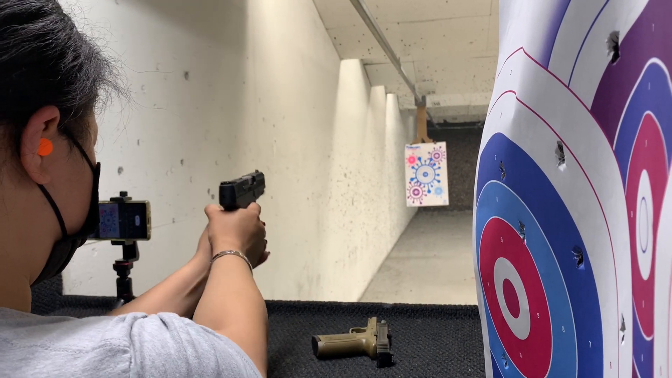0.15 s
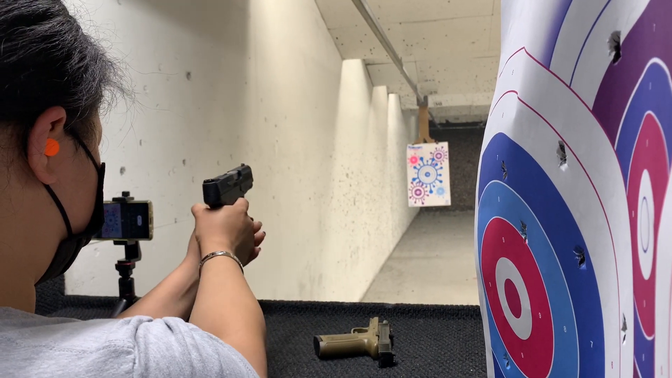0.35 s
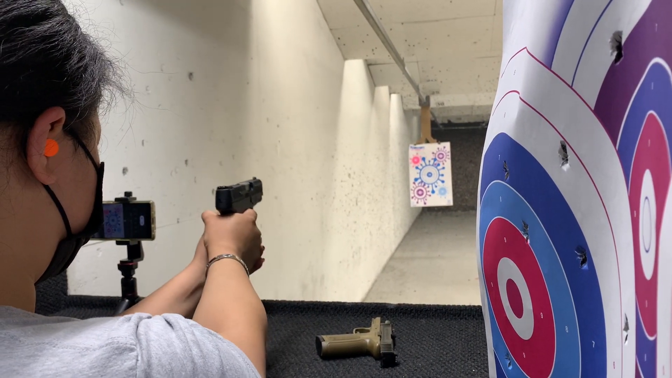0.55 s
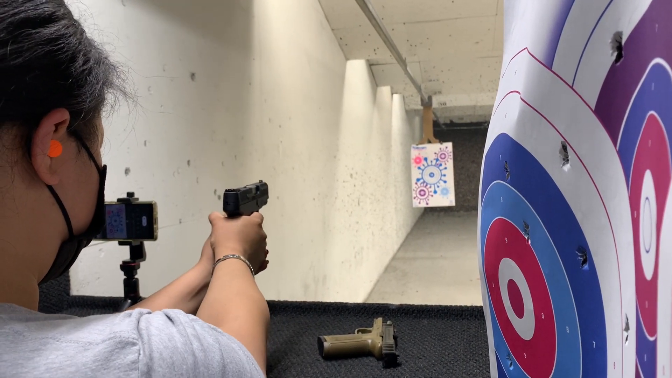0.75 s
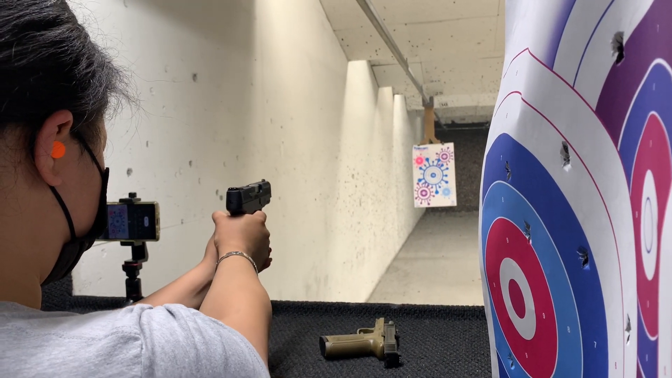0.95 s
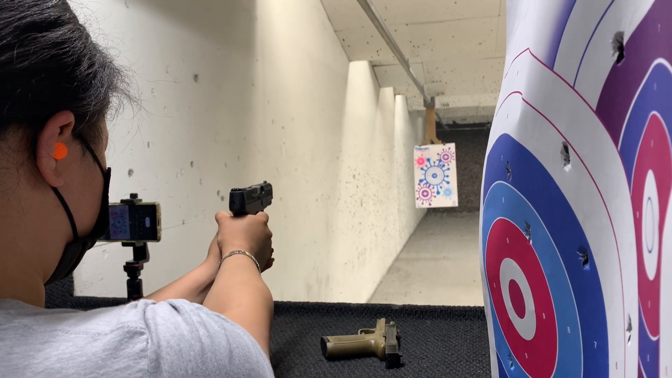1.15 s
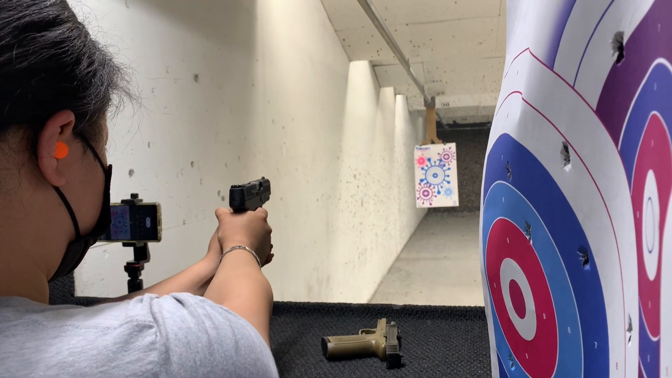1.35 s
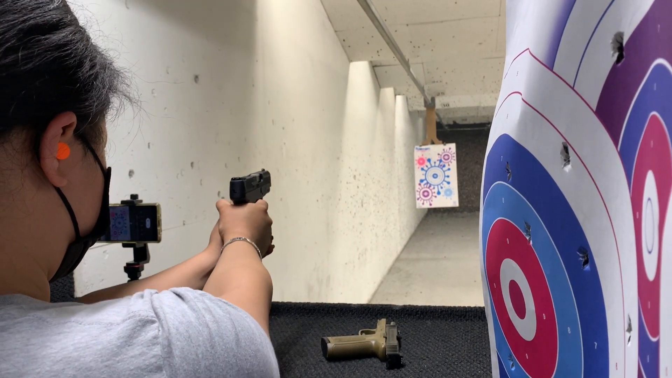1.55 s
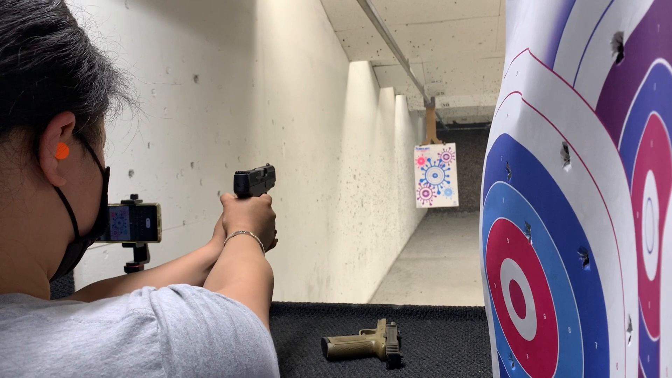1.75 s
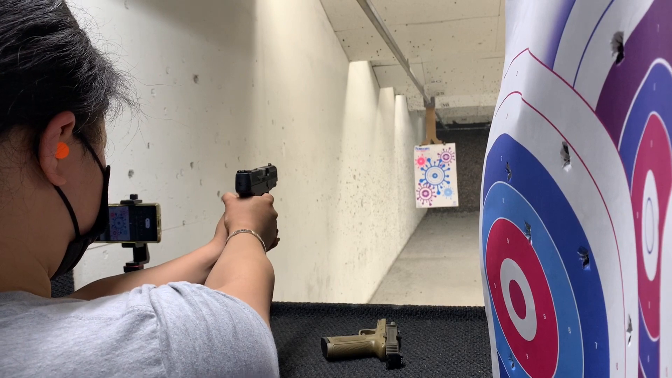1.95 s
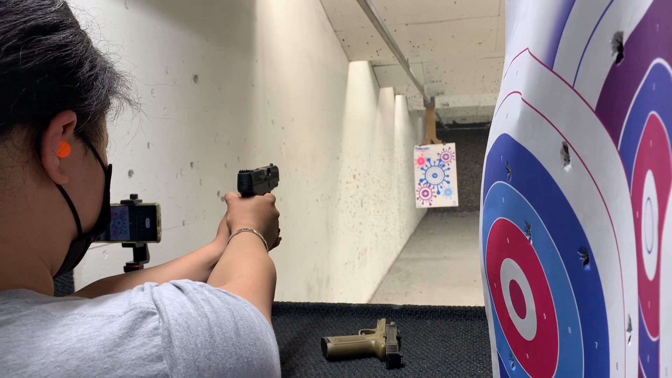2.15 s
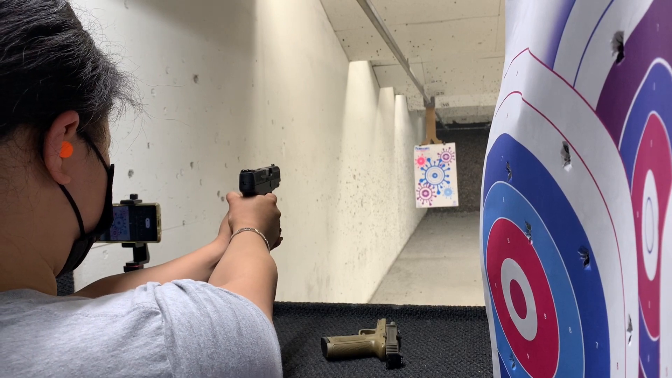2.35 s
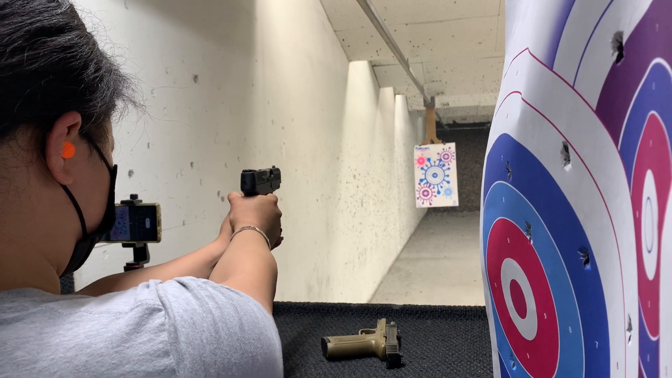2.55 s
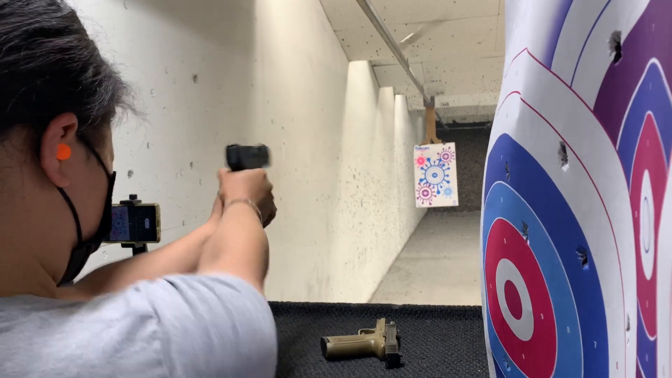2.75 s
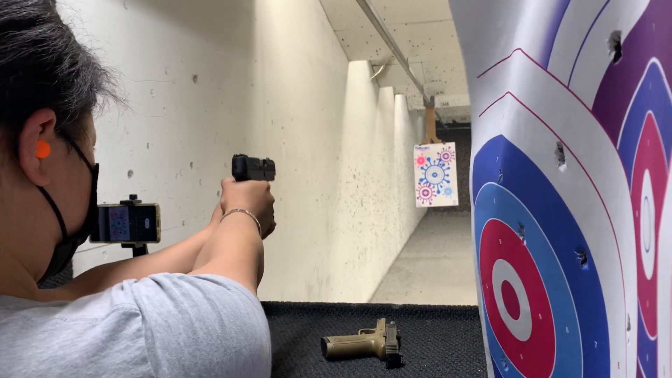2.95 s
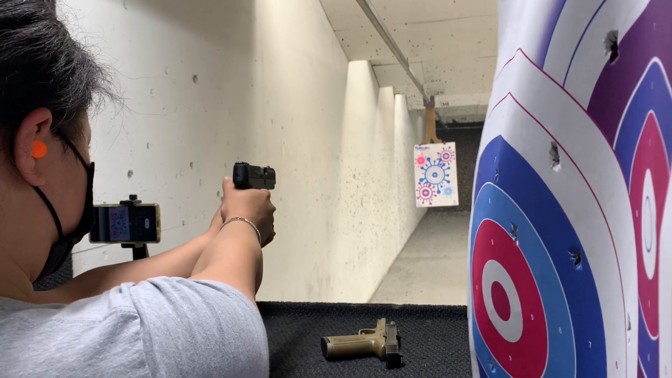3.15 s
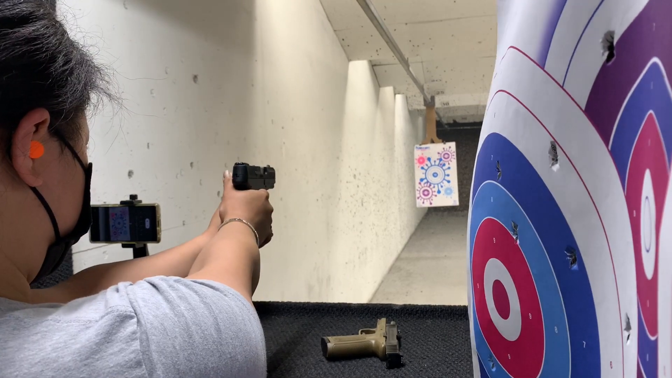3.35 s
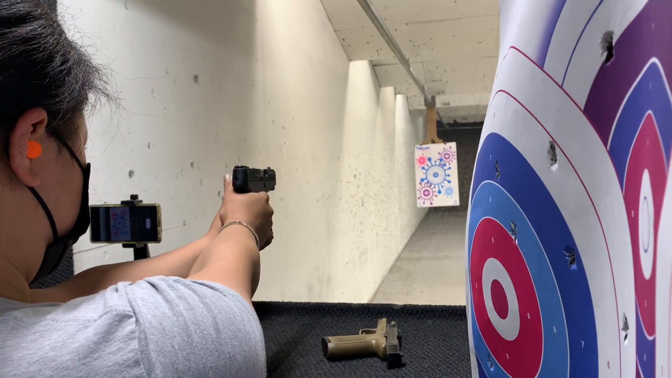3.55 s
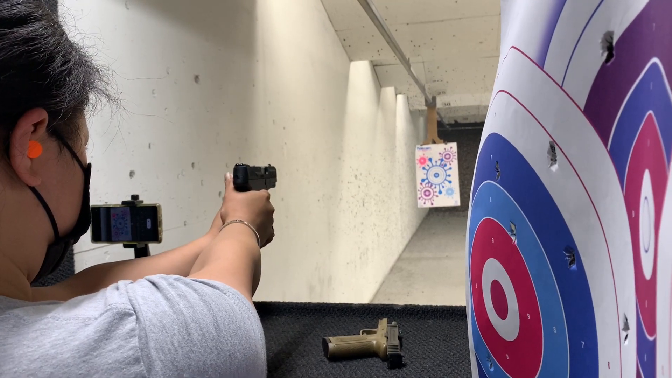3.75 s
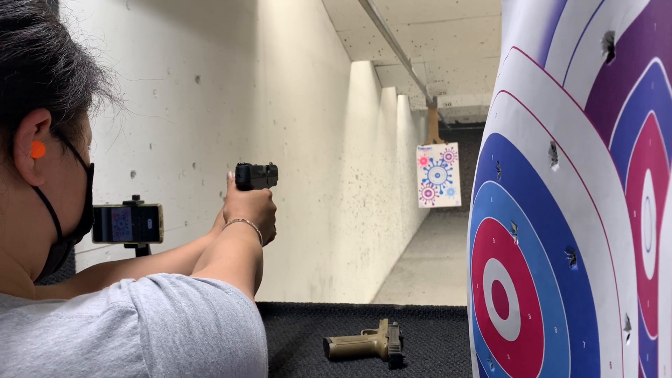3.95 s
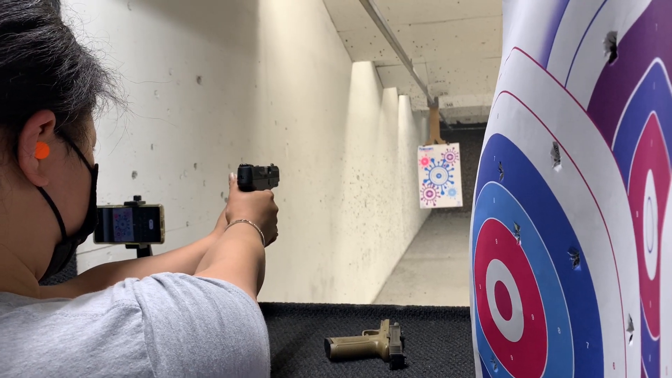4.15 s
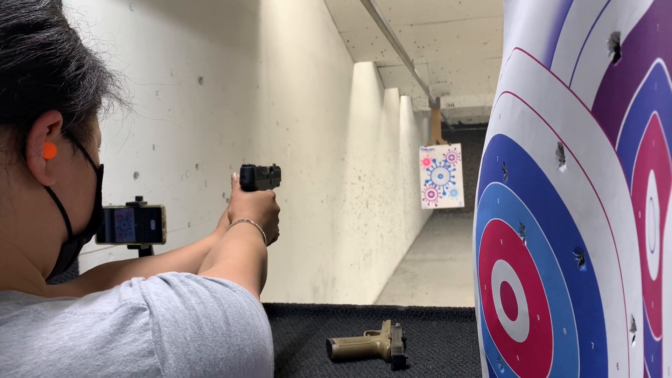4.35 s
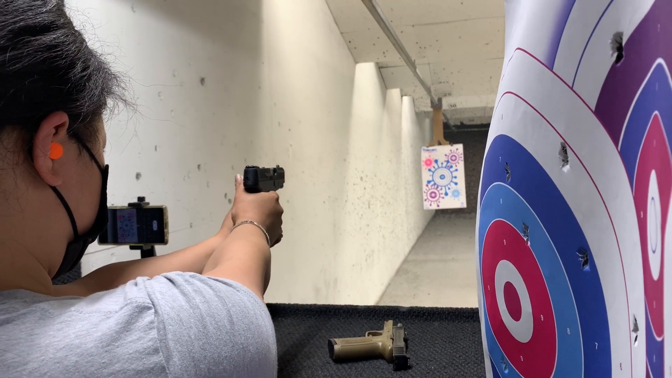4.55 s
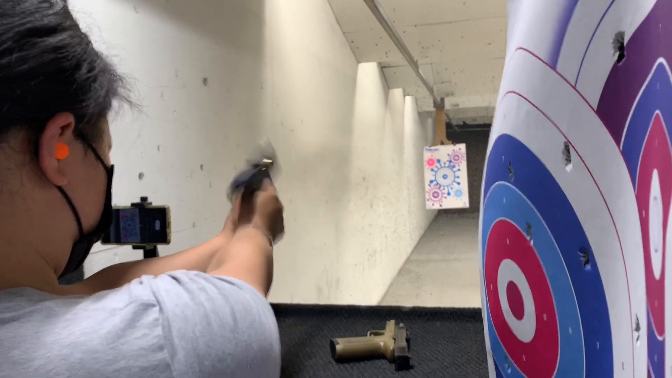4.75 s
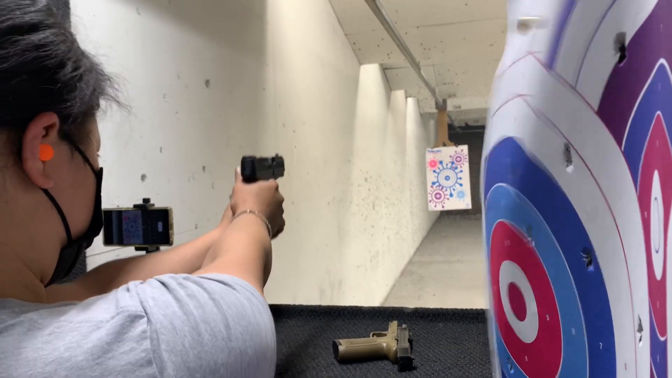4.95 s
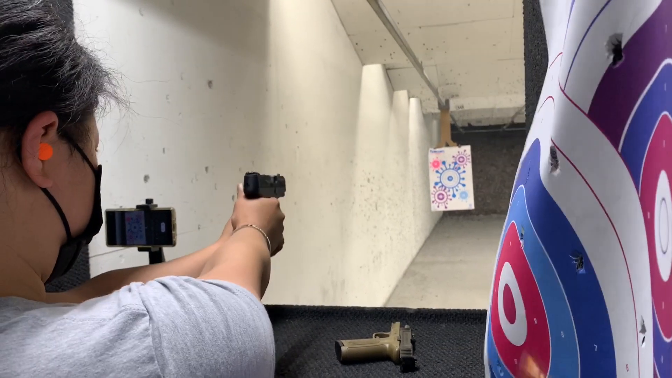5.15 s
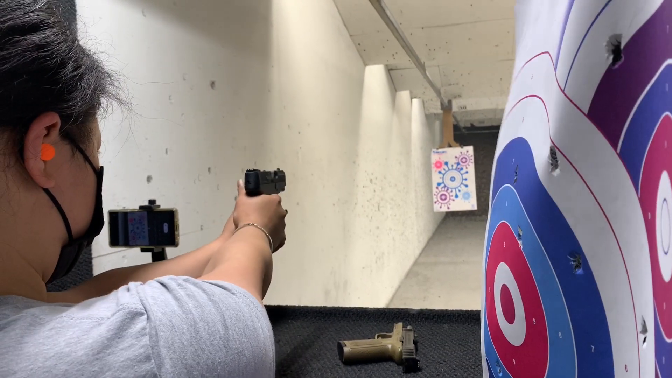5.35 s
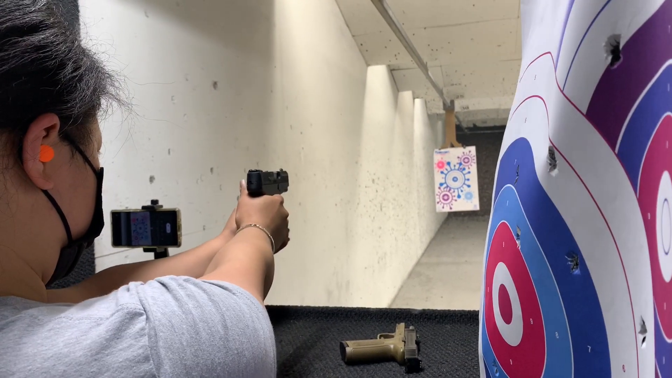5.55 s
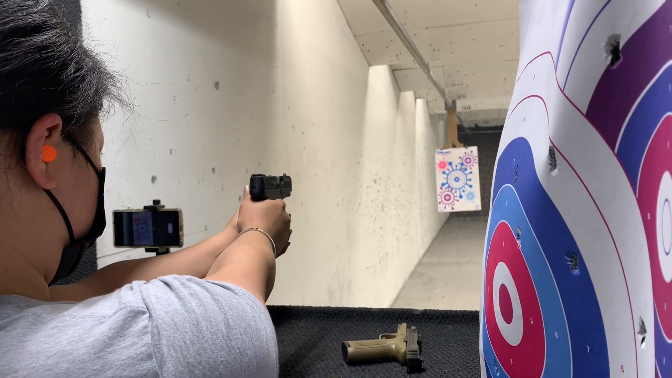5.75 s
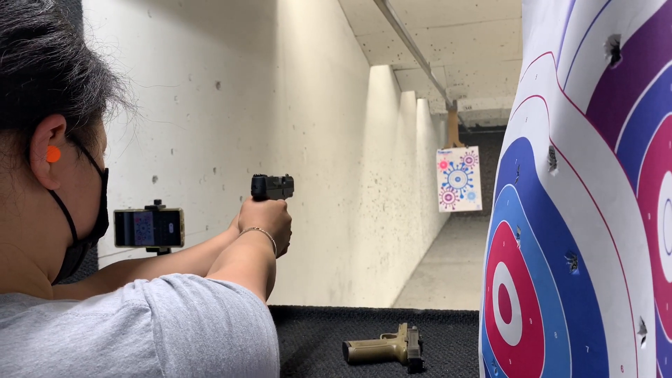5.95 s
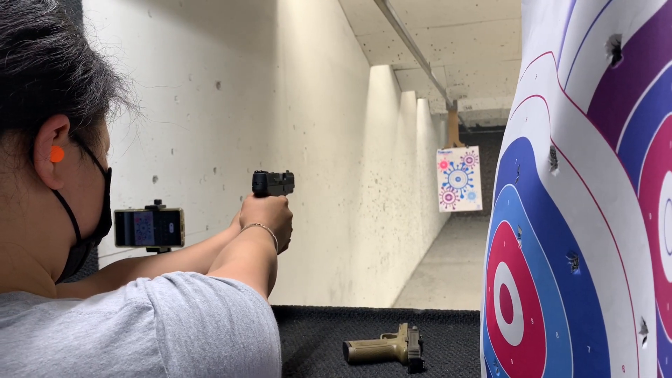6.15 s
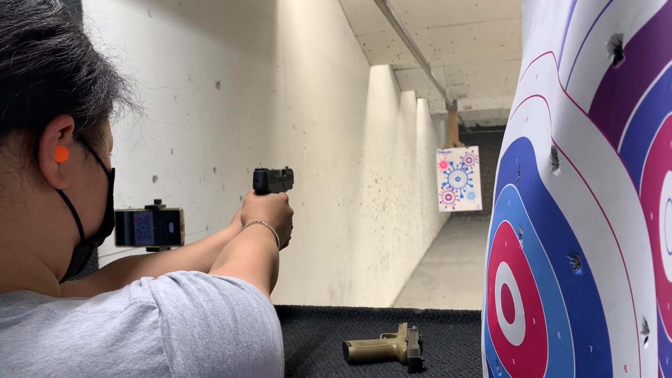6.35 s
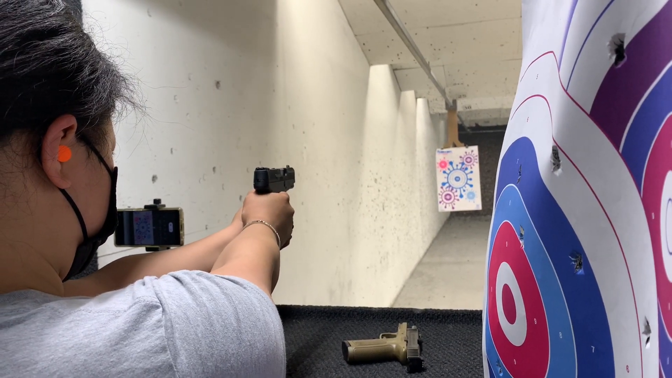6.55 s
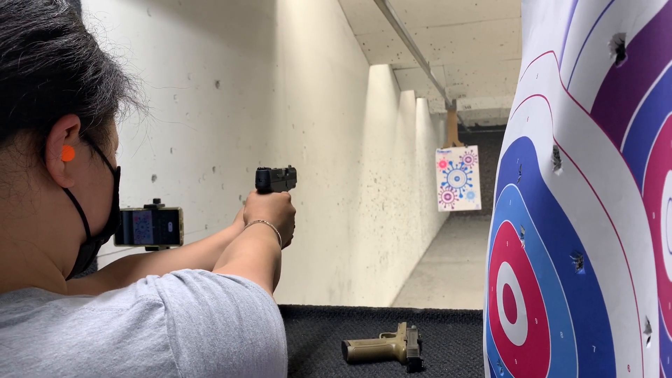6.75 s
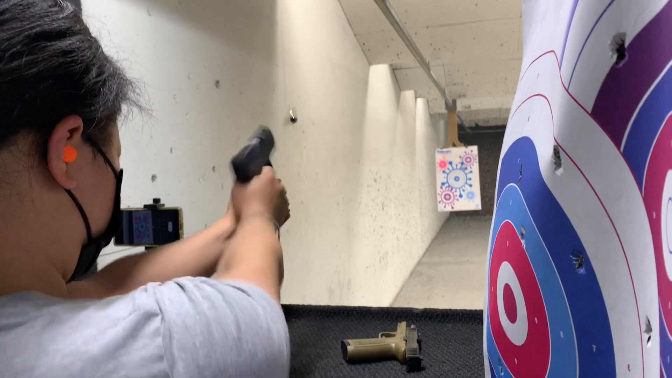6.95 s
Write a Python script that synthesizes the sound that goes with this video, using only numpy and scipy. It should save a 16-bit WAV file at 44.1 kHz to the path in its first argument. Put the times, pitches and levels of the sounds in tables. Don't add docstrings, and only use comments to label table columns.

```python
import sys
import numpy as np
from scipy import signal
from scipy.fft import rfft, irfft, next_fast_len
from scipy.io import wavfile
from scipy.ndimage import uniform_filter1d, map_coordinates

SR = 44100
rng = np.random.default_rng(int(sys.argv[2]) if len(sys.argv) > 2 else 0)


def put_to_file(sound):
    columns = np.atleast_2d(sound).T
    safe = np.clip(columns, -1, 1)
    whole_steps = np.round(safe * 32767)
    wavfile.write(sys.argv[1], SR, whole_steps.astype(np.int16))


def invert_db(level):
    return 10 ** (np.asarray(level, dtype=float) / 20)


N = 313110

# (time [s], peak level [dB], hall level [dB], lane)
SHOTS = [
    (0.65, -5, 1.5, "next"),
    (1.008, -3.5, -2.7, "next"),
    (1.356, -4, -2, "next"),
    (2.548, -15, 1.5, "far"),
    (2.652, -5.5, 2, "own"),
    (4.747, -4, 1.5, "own"),
    (5.064, -10.5, 6.5, "wall"),
    (6.896, -4, -.7, "own"),
]


def unit(x):
    return x / np.sqrt(np.mean(x ** 2) + 1e-20)


def along(points, hz):
    f, v = np.transpose(points)
    return np.interp(np.log(hz + 1), np.log(f + 1), v)


def filtered(x, response):
    n = x.shape[-1]
    m = next_fast_len(n + 8192)
    return irfft(rfft(x, m) * response(np.fft.rfftfreq(m, 1 / SR)), m)[..., :n]


def resonant(peaks):
    def response(f):
        total = 0
        for k, (centre, width, db) in enumerate(peaks):
            damping = 1j * f * width
            total = total + (-1) ** k * invert_db(db) * damping / (centre * centre - f * f + damping)
        return total
    return response


def spread(pair):
    # (frequency [Hz], phase [rad])
    left_lead = [(60, .05), (200, 0.61), (350, 0.63), (570, 1.7), (900, 6.67), (1400, 3)]
    treble_lag = 1 / 3350

    def lead(hz):
        return np.where(hz < 4000, along(left_lead, hz), -2 * np.pi * hz * treble_lag)
    return filtered(pair, lambda hz: np.exp(.5j * np.outer([1, -1], lead(hz))))


def ports(n):
    # (frequency [Hz], likeness [0-1])
    likeness = [(60, 0.8), (200, 0.9), (350, 0), (900, 0), (1500, 0.1), (3000, .1), (7000, 0), (9000, 0),
                (10500, .93), (15000, 0.79)]

    def shares(hz):
        turn = np.arccos(np.clip(along(likeness, hz), 0, 1)) / 2
        return np.array([np.cos(turn), np.sin(turn)])
    mid, side = filtered(rng.standard_normal((2, n)), shares)
    return spread(np.array([mid + side, mid - side]))


def narrow(peaks, n, sharp=1):
    def response(f):
        return sum(invert_db(db) * resonant([(hz, sharp * w, 0)])(f) ** 2 for hz, w, db in peaks)
    return unit(filtered(ports(n), response))


def dying(noise, t60s, patchy_db=0):
    hz, t, z = signal.stft(noise, SR, nperseg=256)
    clumps = uniform_filter1d(rng.standard_normal(z.shape[1:]), size=5, axis=0)
    clumps = unit(uniform_filter1d(clumps, size=4, axis=1))
    fade_db = -60 * t / np.clip(along(t60s, hz), .02, 9)[:, None]
    faded = signal.istft(z * invert_db(fade_db + patchy_db * clumps), SR, nperseg=256)[1]
    return faded[:, :noise.shape[1]]


def ringing(modes, t, attack, spread_db, unlike):
    hz, db, t60 = np.transpose(modes)[:, :, None, None]
    luck = rng.standard_normal((2, len(modes), 2, 1))
    phase = 2 * luck[1, :, :1] + unlike * luck[1]
    strength = invert_db(db + spread_db * luck[0, :, :1] - 60 * t / np.clip(t60, .02, 4))
    sines = strength * np.sin(2 * np.pi * hz * t + phase)
    return sines.sum(0) * (1 - np.exp(-t / attack))


def add(out, s, db, pan_db, x):
    part = out[:, round(s * SR):][:, :x.shape[1]]
    part += (invert_db(db + pan_db * np.array([[.5], [-.5]])) * x)[:, :part.shape[1]]


def ventilation():
    # (frequency [Hz], level [dB per Hz])
    rush_colour = [(13, -52), (22, -26.5), (60, 2.5), (87, -20), (156, -16), (256, -28), (400, -36),
                   (700, -40.5), (1300, -44), (2600, -53), (5000, -61), (11000, -61.5), (16000, -74)]
    # (frequency [Hz], width [Hz], level [dB])
    duct_tones = [(57.6, 12, -69), (148, 18, -76.5)]
    surge_db, surge_s = 9, .55
    level_db = -62.5 + surge_db * np.exp(-np.arange(N) / SR / surge_s)
    rush = unit(filtered(ports(N), lambda hz: invert_db(along(rush_colour, hz))))
    tones = sum(invert_db(db) * narrow([(hz, w, 0)], N) for hz, w, db in duct_tones)
    return invert_db(level_db) * (invert_db(-2.5) * rush + invert_db(63.5) * tones)


def duct():
    # (frequency [Hz], level [dB])
    duct_modes = [(623, 0), (632, -2.5)]
    earlier_shot_ago, fade_db_per_s = 2.5, 6
    t = np.arange(N) / SR
    fired = np.array([-earlier_shot_ago] + [row[0] for row in SHOTS])
    since = t - fired[np.searchsorted(fired, t, "right") - 1]
    drift = map_coordinates(rng.standard_normal(30), [4 * t])
    sides = np.array([[.4], [-.4]])
    pair = 0
    for k, (hz, db) in enumerate(duct_modes):
        pair = pair + invert_db(db) * np.sin(2 * np.pi * hz * t + 2.2 * k * drift + sides)
    return uniform_filter1d(invert_db(-72.5 - fade_db_per_s * since), size=2000, origin=999) * pair


def sheet():
    swing_hz, swing_db, after_s, lasts_s = 58, -47, .3, .15
    t = np.arange(N) / SR
    swing = sum(np.exp(-((t - s - after_s) / lasts_s) ** 4) for s, *_, lane in SHOTS if lane == "own")
    return invert_db(swing_db) * swing * np.sin(2 * np.pi * swing_hz * t + np.array([[-.3], [.3]]))


def casings():
    # (time [s], body tick [dB], mouth ring [dB], tick frequency [Hz])
    bounces = [(1.935, -62, -67, 4940), (1.9843, -68.5, -77.5, 5450), (2.2184, -67.5, -91, 5300),
               (2.2604, -82.5, -83, 5340), (2.3945, -59, -69.5, 5210), (2.4214, -50.5, -69, 5350),
               (3.127, -61.5, -87, 5260), (3.3498, -64, -77, 4180), (3.4022, -57, -56, 4170),
               (3.5349, -63.5, -72, 4600), (3.6994, -79.5, -97.5, 4330), (3.9379, -57.5, -79, 4500),
               (4.1294, -88.5, -93, 4220), (5.5263, -55, -59.5, 5400), (6.0551, -66, -60, 6300),
               (6.315, -63, -74, 4036), (6.4447, -60.5, -71, 4540), (6.5252, -83, -87, 4490),
               (6.6634, -89.5, -77, 5050), (6.7184, -85, -72, 4150)]
    # (frequency [Hz], level [dB], t60 [s])
    tube_modes = [(10760, 0, .36), (10830, -2, .32), (10900, -6, .24), (10620, -10, .12)]
    # (multiple of tick frequency, width as share of it, level [dB])
    overtones = [(1.25, 0.18, -8.5), (1.58, 0.13, -10.5), (2.55, .3, -15.5)]
    # (time [s], length [s], level [dB])
    stirs = [
        (3.34, 0.14, -60),
        (4.168, .17, -66),
        (4.63, .12, -87.5),
    ]
    out, t = np.zeros((2, N)), np.arange(SR // 2) / SR
    for s, tick_db, ring_db, tick_hz in bounces:
        puff = ports(len(t)) * (invert_db(-60 * t / .012) + invert_db(-10.5 - 60 * t / 0.23))
        body = [(tick_hz, 0.15 * tick_hz, 0)]
        body += [(k * tick_hz, w * tick_hz, level_db) for k, w, level_db in overtones]
        tick = filtered(puff, resonant(body))
        click = invert_db(8) * filtered(puff, lambda hz: hz ** 4 / (hz ** 4 + 11000 ** 4))
        ring = spread(ringing(tube_modes, t, .003, spread_db=1.5, unlike=.2))
        add(out, s, tick_db + 10, 2.5, tick)
        add(out, s, ring_db - 1.5, 0, ring + click)
    for s, length, db in stirs:
        stir = filtered(ports(len(t)), lambda hz: hz / (hz + 900) / (1 + (hz / 5500) ** 1.8) * (hz < 14600))
        add(out, s, db, 0, stir * np.exp(-(t / length) ** 4) * (1 - np.exp(-t / 0.0079)))
    return out


def lead_in(s, noise):
    block_s, block_start = 1024 / SR, .623
    early = (s - .010 - block_start) % block_s + .010
    u = np.linspace(0, 1, round(early * SR))
    smear = filtered(noise[:, -len(u):], lambda hz: (hz < 8400) * (1 + hz / 6000))
    return s - early, smear * (0.32 * u + u ** 5)


def pressure_pulse(t):
    # (frequency [Hz], width [Hz], level [dB])
    bench = [(620, 300, -3), (1120, 350, -1)]
    n = SR // 10
    luck = rng.random((9, 3))
    delay = np.cumsum(.0012 + .004 * luck[:, :1], axis=0) - .001
    arrival = delay + 0.00017 * (luck[:, 1:] - .5)
    u = np.clip((t[:n] - arrival[:, :, None]) / 0.0001, 0, 60)
    strength = np.sign(luck[:, :1] - .35) * invert_db(-60 * delay / .2)
    pulses = (u > 0) * (1 - u) * np.exp(-u) * strength[:, :, None]

    def response(hz):
        return .4 / (1 + (hz / 2500) ** 2) + np.abs(resonant(bench)(hz))
    return np.pad(filtered(pulses.sum(0), response), ((0, 0), (0, len(t) - n)))


def muzzle_crack(t, crack_db, rise_s):
    late = t - 1.4 * rise_s
    snaps = invert_db(-60 * t / 0.025) * (1 - np.exp(-t / (.12 * rise_s)))
    snaps = snaps + invert_db(-4.0 - 60 * late / .05) * (late > 0)
    crack = invert_db(crack_db - 12.5) * snaps * filtered(ports(len(t)), lambda hz: hz / (hz + 1500))
    return crack + invert_db(1.2 * crack_db + 5) * pressure_pulse(t)


def pressure_thump(t, thump_db):
    push = np.sin(2 * np.pi * 55 * t + np.array([[-.3], [.3]]))
    return invert_db(thump_db - 11.5) * push * invert_db(-60 * t / .2) * (1 - np.exp(-t / 0.0065))


def blast_noise(n, bright_db, boom_db):
    # (frequency [Hz], level [dB per Hz])
    blast_colour = [(15, -46.5), (25, -26), (70, -15), (130, -10.5), (238, -2.5), (410, -2.5), (651, -2),
                    (877, -9), (1180, -9), (1830, -14.5), (8360, -30), (14300, -33.5), (15600, -45.5),
                    (16600, -89)]

    def colour(hz):
        bright = bright_db * np.log2(np.clip(hz, 700, SR) / 700)
        boom = boom_db * np.log2(np.clip(hz, 100, 700) / 700)
        return invert_db(along(blast_colour, hz) + bright - boom)
    return unit(filtered(ports(n), colour))


def booth_and_hall(t, near_noise, hall_noise, hall_db):
    # (frequency [Hz], t60 [s])
    booth_t60 = [(60, 0.95), (200, .4), (700, 0.38), (3000, 0.21), (8000, 0.28), (14000, 0.11)]
    # (frequency [Hz], t60 [s])
    hall_t60 = [(60, 0.27), (200, 1), (700, 0.65), (3000, 0.59), (8000, 0.48), (14000, .35)]
    room = invert_db(1.6) * dying(near_noise, booth_t60, patchy_db=2.2)
    room = room + invert_db(hall_db - 9) * dying(hall_noise, hall_t60, patchy_db=1.5)
    bass = filtered(room, lambda hz: 1 / (1 + (hz / 380) ** 4))
    middle = filtered(room, lambda hz: np.exp(-np.log2((hz + 1) / 440) ** 4))

    def bump(at):
        return np.exp(-((t - at) / .045) ** 2)
    swell = invert_db(4.5 * bump(.3) - 3.5 * bump(.195)) - 1
    return room - bass * np.exp(-t / .011) + swell * middle


def far_building(n):
    # (frequency [Hz], level [dB per Hz])
    tail_colour = [(59, -51.5), (100, -17), (157, -3), (353, -15), (477, -26), (905, -28), (1030, -24.5),
                   (9000, -50), (11700, -73.5), (19800, -120)]
    # (frequency [Hz], t60 [s])
    tail_t60 = [(60, 0.69), (200, 0.93), (700, 1.8), (3000, 2.2), (8000, 1), (14000, .6)]
    noise = unit(filtered(ports(n), lambda hz: invert_db(along(tail_colour, hz))))
    return invert_db(-37.5) * dying(noise, tail_t60)


def steel_baffles(t, baffle_db, near):
    # (frequency [Hz], width [Hz], level [dB])
    next_baffles = [(356, 45, -9), (520, 12, -11), (723, 20, -11.5), (888, 20, -3), (912, 25, -4.5),
                    (990, 24, -10), (1090, 15, -11.5), (1230, 28, -8.5), (1350, 15, -11.5),
                    (1710, 21, -14.5), (1860, 19, -15.5), (2280, 31, -21.5), (2490, 11, -14)]
    # (frequency [Hz], width [Hz], level [dB])
    own_baffles = [(315, 25, -4), (420, 42, -13), (504, 15, -7), (685, 13, -9), (795, 25, -7),
                   (855, 20, -5), (890, 15, -10), (984, 18, -9.5), (1146, 30, -8), (1380, 23, -10),
                   (1480, 25, -15), (2000, 60, -20), (2380, 30, -14)]
    steel = near * narrow(own_baffles, len(t), sharp=.27)
    steel = steel + (1 - near) * narrow(next_baffles, len(t), sharp=.27)
    return invert_db(baffle_db - 45 - 60 * t / 2.4) * steel


def standing_waves(t, waves_db):
    # (frequency [Hz], level [dB], t60 [s])
    axial_modes = [(160.4, 1.5, 1.55), (220.3, -1.5, 1), (363, -2, 1)]
    return invert_db(waves_db - 25.5) * ringing(axial_modes, t, .05, spread_db=0.5, unlike=0.23)


def shots():
    arrivals = {"own": (1.42, -.4, 3.5, .004), "next": (1.53, -.7, -8, .0105), "far": (.18, -4, -10, .009),
                "wall": (.8, 2.1, -7, .009)}
    stirred = {"own": (.8, -3, 1.1, .9), "next": (-5, -5.5, .9, .15), "far": (-6.5, -4, -.3, .8),
               "wall": (7.5, 11, -6, .15)}
    out, n = np.zeros((2, N)), 5 * SR // 2
    t = np.arange(n) / SR
    for s, db, hall_db, lane in SHOTS:
        bright_db, boom_db, crack_db, rise_s = arrivals[lane]
        thump_db, waves_db, baffle_db, near = stirred[lane]
        noise = blast_noise(n, bright_db, boom_db)
        room = booth_and_hall(t, noise, blast_noise(n, bright_db, boom_db), hall_db)
        rise = 1 - np.exp(-t / rise_s)
        reflected = rise * (room + far_building(n) + steel_baffles(t, baffle_db, near))
        direct = muzzle_crack(t, crack_db, rise_s) + pressure_thump(t, thump_db)
        add(out, s, db + 1, .6, reflected + direct + standing_waves(t, waves_db))
        start, smear = lead_in(s, noise)
        add(out, start, db - 6 - 750 * (s - start), 0, smear)
    return out


def scene():
    return ventilation() + duct() + sheet() + casings() + shots()


def band_limit(x):
    return signal.sosfilt(signal.butter(12, 16640, fs=SR, output="sos"), x)


def record(dry):
    heard = filtered(dry, lambda hz: (1j * hz / (1j * hz + 35)) ** 2)
    loud = np.sqrt(np.abs(uniform_filter1d(np.mean(heard ** 2, 0), size=900, origin=300)))
    held = heard / (1 + (loud / invert_db(-10)) ** 3) ** (1 / 3)
    bent = held / (1 + np.abs(held / .98) ** 6) ** (1 / 6)
    mix = filtered(bent, lambda hz: 1 / (1 + (hz / 15950) ** 90))
    return band_limit(mix)


dry = scene()
out = record(dry)
put_to_file(out)
```